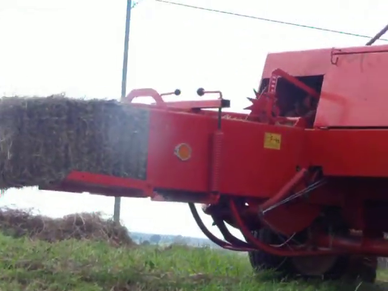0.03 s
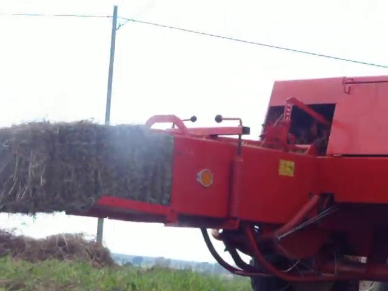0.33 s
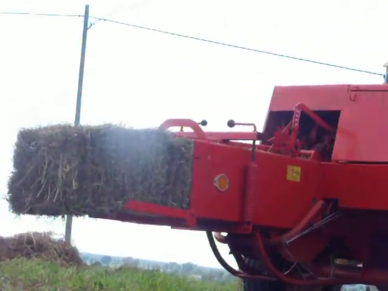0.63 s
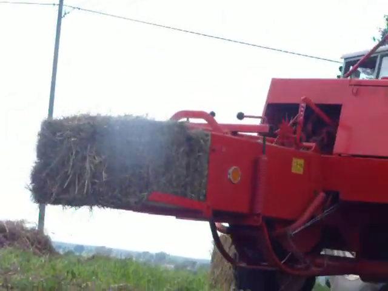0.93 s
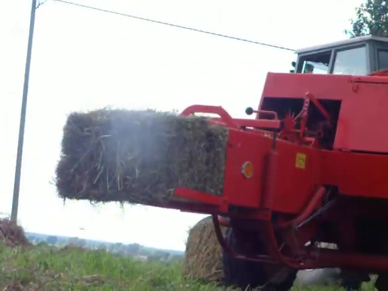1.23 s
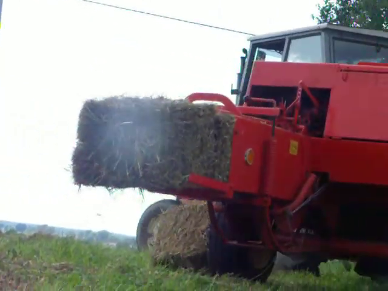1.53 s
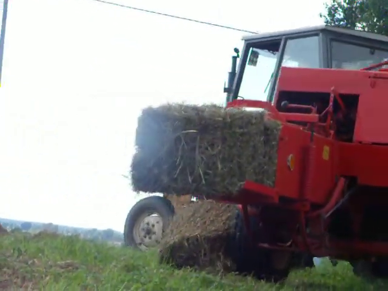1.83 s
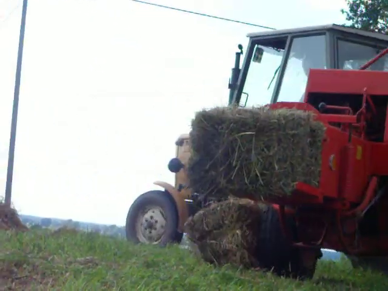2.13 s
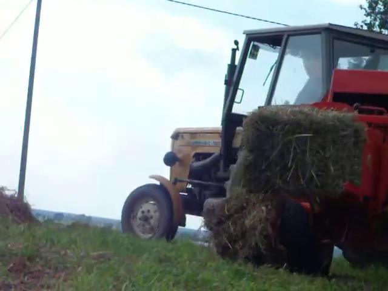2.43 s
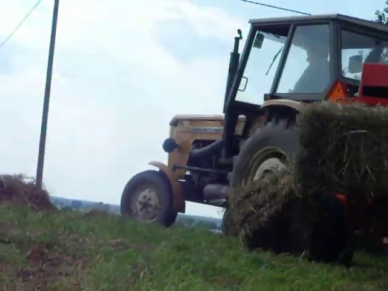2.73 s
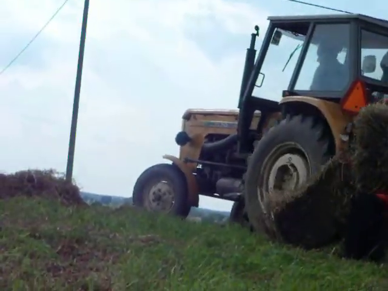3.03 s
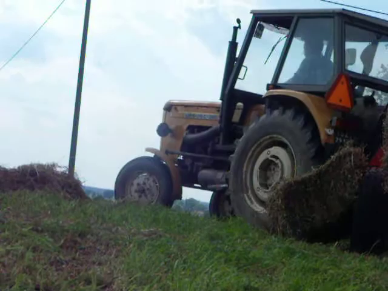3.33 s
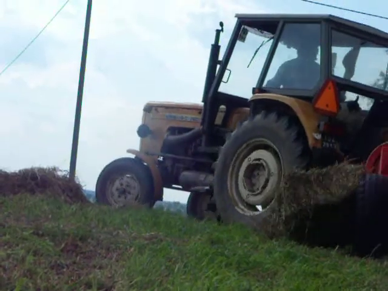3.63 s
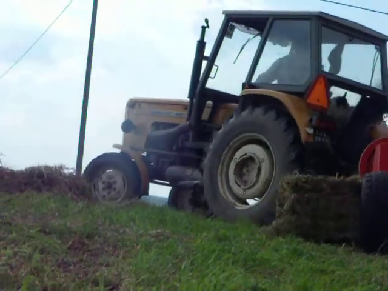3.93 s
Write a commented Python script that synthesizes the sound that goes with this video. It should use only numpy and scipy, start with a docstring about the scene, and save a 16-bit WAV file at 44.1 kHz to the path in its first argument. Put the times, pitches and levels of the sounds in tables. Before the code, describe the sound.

A hay baler works close by in an open field, its tines swishing quickly while the plunger rumbles and thuds about once a second. Metal clanks and dry stalks crunch over a steady tractor engine, with low wind later.

```python
"""Tractor and hay baler

An old diesel tractor draws a square baler past the listener and away over a field. Steel tines
(the pickup's prongs) swish through the hay three and a half times a second. The plunger that packs
it goes to and fro about once a second, shaking the sheet-metal chamber with rumble, thuds and knocks.
Stalks crunch and the feeder clanks, over the steady engine and a low wind."""
import sys
import numpy as np
from scipy import signal
from scipy.fft import rfft, irfft
from scipy.io import wavfile

SR = 44100
rng = np.random.default_rng(int(sys.argv[2]) if len(sys.argv) > 2 else 0)


def master_out(mix):
    """Clip the mix to full scale and print it as 16-bit PCM to the path in sys.argv[1]."""
    frames = np.transpose(np.atleast_2d(mix))
    ceiling = np.clip(frames, -1, 1)
    pcm = np.round(ceiling * 32767).astype(np.int16)
    wavfile.write(sys.argv[1], SR, pcm)


N = 176400
TIME = np.arange(N) / SR
FREQS = np.fft.rfftfreq(N, 1 / SR)


def amp(db):
    """Turns decibels into a gain."""
    return 10 ** (np.asarray(db) / 20)


def unit(x):
    """Scales x to a standard strength (rms 1)."""
    return x / np.sqrt(np.mean(x ** 2) + 1e-20)


def curve(points):
    """Joins (time, value) points by straight lines."""
    return np.interp(TIME, *np.transpose(points))


def colour(x, points):
    """Shapes the bass and treble of x by (f/Hz, level/dB) points, at rms 1."""
    hz, db = np.transpose(points)
    gain = amp(np.interp(np.log(FREQS + 1), np.log(hz), db))
    return unit(irfft(rfft(x) * gain, N))


def drift(rate_hz):
    """A slow random wander, at rms 1."""
    return unit(irfft(rfft(rng.standard_normal(N)) * np.exp(-(FREQS / rate_hz) ** 2), N))


def impacts(per_s, spread_db):
    """Tiny taps of uneven size at random moments."""
    size = amp(spread_db * np.minimum(rng.exponential(1, N), 4))
    return unit(size * rng.choice([-1, 1], N) * (rng.random(N) < per_s / SR))


def ring(x, modes):
    """Metal struck by x rings at its own notes; wider notes die sooner."""
    t = TIME[:SR // 4]
    body = sum(amp(db) * np.sqrt(width) * np.exp(-np.pi * width * t) * np.sin(2 * np.pi * hz * t)
               for hz, width, db in modes)
    return signal.fftconvolve(x, body / np.linalg.norm(body))[:N]


def swell(peak, rise, fall):
    """A smooth hump with its own rise and fall time."""
    return np.exp(-.5 * ((TIME - peak) / np.where(TIME < peak, rise, fall)) ** 2)


# sweeps of the tines: start t/s, scrape level/dB, rise/s, hold/s, fall/(dB per s), ring level/dB
TINE_SWEEPS = [(-.03, -13.5, 0.022, 0.012, 145, -14), (0.247, -11, .025, 0.024, 126, -13.5),
               (0.54, -11.5, 0.03, 0.0091, 128, -13.5), (.822, -17, 0.016, 0.02, 107, -16),
               (1.104, -21, 0.023, 0.017, 73, -20.5), (1.391, -14, 0.032, 0.015, 139, -13.5),
               (1.709, -11.5, 0.022, 0.0067, 125, -14), (1.968, -15.5, 0.023, 0.0089, 92, -16.5),
               (2.253, -15.5, 0.015, 0.0091, 149, -19.5), (2.519, -14, 0.037, .015, 116, -19.5),
               (2.832, -15, 0.015, 0.018, 96, -19), (3.096, -20, .035, 0.031, 88, -20),
               (3.395, -19.5, 0.018, 0.011, 92, -21.5), (3.668, -19, 0.021, 0.02, 98, -19),
               (3.955, -18.5, 0.04, 0.038, 92, -15.5)]
# tone colour of the scrape: f/Hz, level/dB
SWISH_COLOUR = [(300, -25), (1200, -23), (1900, -15), (2400, -1), (2650, 3), (3200, 3.5), (3600, 5),
                (4300, 7.5), (5200, 6), (5900, -7)]
# ringing notes of the tines and their guides: f/Hz, width/Hz, level/dB
STEEL_NOTES = [(1530, 24, -17.5), (2090, 76, -19), (2338, 91, -6.5), (2503, 68, -5.5), (2800, 170, -10.5),
               (3005, 80, 0), (3218, 120, -3), (4310, 110, -5.5), (4720, 150, -4.5), (5003, 100, -12.5),
               (5225, 110, -12.5)]

def tines(ring_lag_s=0.0075, detune=0.005):
    """Each row of tines scrapes through the hay in a burst of fine taps; then the steel rings."""
    scrape_power, ringing = np.zeros(N), np.zeros(N)
    taps = impacts(per_s=4000, spread_db=2)
    for start, scrape_db, rise, hold, fall, ring_db in TINE_SWEEPS:
        span = (TIME >= start) & (TIME < start + 0.5)
        t = TIME[span] - start
        bite = np.clip(t / rise, 0, 1) ** 1.1
        burst = bite * amp(-fall * np.maximum(t - rise - hold, 0))
        scrape_power[span] += (amp(scrape_db) * burst) ** 2
        notes = [(hz * (1 + detune * rng.standard_normal()), width, db) for hz, width, db in STEEL_NOTES]
        late_burst = np.interp(t - ring_lag_s, t, burst)
        ringing[span] += ring(amp(ring_db) * late_burst * taps[span], notes)[:len(t)]
    swish = colour(impacts(per_s=4000, spread_db=2), SWISH_COLOUR)
    return ringing + np.sqrt(scrape_power) * swish


# strokes, forward and back in turn: peak t/s, rise/s, fall/s, rumble level/dB, clatter level/dB
PLUNGER_STROKES = [(.33, 0.21, 0.13, -18.5, -19.5), (.96, 0.16, 0.18, -21, -21.5),
                   (1.37, 0.063, 0.2, -16.5, -22), (2.051, 0.19, 0.15, -18, -21.5),
                   (2.49, .11, 0.1, -18.5, -22), (3.191, 0.24, 0.096, -21.5, -22.5),
                   (3.56, 0.12, 0.22, -27, -23)]
# tone colour of the rumble: f/Hz, level/dB
RUMBLE_COLOUR = [(40, -32.5), (80, -12), (108, -3.5), (128, -3), (158, -0.5), (200, -8.5), (300, -11),
                 (500, -16.5), (1500, -55)]
# tone colour of the clatter: f/Hz, level/dB
CLATTER_COLOUR = [(100, -32), (250, -4), (380, 2.5), (550, 0.5), (800, 3.5), (1300, -6.5), (2200, -7.5),
                  (3500, -12.5), (5500, -30)]
# ringing notes of the chamber's panels: f/Hz, width/Hz, level/dB
PANEL_NOTES = [(100, 13, 0.5), (163, 18, -8), (185, 14, -4), (234, 28, -5.5), (274, 42, -3.5),
               (369, 38, -1.5), (420.3, 14, -9), (481, 18, -12.5), (632, 55, -11), (819, 30, -9)]

def plunger(ring_db=-1):
    """Each stroke makes the chamber rumble and its loose panels clatter and ring."""
    rumble_power, clatter_power = np.zeros(N), np.zeros(N)
    for peak, rise, fall, rumble_db, clatter_db in PLUNGER_STROKES:
        stroke = swell(peak, rise, fall)
        rumble_power += (amp(rumble_db) * stroke) ** 2
        clatter_power += (amp(clatter_db) * stroke) ** 2
    shake = np.sqrt(clatter_power)
    rattle = impacts(per_s=900, spread_db=3)
    rumble = np.sqrt(rumble_power) * colour(rng.standard_normal(N), RUMBLE_COLOUR)
    clatter = shake * colour(rattle, CLATTER_COLOUR)
    return rumble + clatter + amp(ring_db) * ring(shake * rattle, PANEL_NOTES)


# blows on the wad of hay: t/s, peak level/dB, starting f/Hz
WAD_THUDS = [(.055, -16, 150.7), (0.171, -9.5, 136), (0.212, -8.5, 150), (0.272, -8, 124), (.452, -11, 128),
             (.80, -16, 112), (0.977, -13, 150), (1.015, -11.5, 106), (1.078, -10, 99), (1.284, -8, 157),
             (1.382, -10.5, 150), (1.92, -14, 130), (2.112, -11, 104), (2.305, -10, 173), (2.4, -10, 109),
             (2.461, -7.5, 119.4), (3.06, -14, 110), (3.165, -6.5, 160), (3.213, -7.5, 160),
             (3.487, -11, 132), (3.558, -10.5, 113), (3.672, -14.5, 153)]

def thuds(rise_s=0.0086, sag_per_s=1.6):
    """Ramming the soft wad gives a short, low boom that sags in pitch."""
    out = np.zeros(N)
    for start, db, hz in WAD_THUDS:
        t = np.clip(TIME - start, 0, 0.2)
        age = t / rise_s
        blow = (age * np.exp(1 - age)) ** 2
        out += amp(db) * blow * np.sin(2 * np.pi * hz * t * (1 - sag_per_s * t / 2))
    return out


# bumps of the frame: t/s, peak level/dB
FRAME_KNOCKS = [(1.663, -4), (2.055, -17), (2.471, -15), (3.778, -7.5)]

def knocks():
    """Each bump is a dull push, followed by a short ring of the panels."""
    pushes = np.zeros(N)
    for start, db in FRAME_KNOCKS:
        push_s = rng.uniform(0.0012, 0.00135)
        age = np.maximum(TIME - start, 0) / push_s
        push = age * (2 - age) * np.exp(-age)
        pushes -= amp(db) * push / push.max()
    return pushes + 0.0181 * ring(pushes, PANEL_NOTES)


# clanks of the rods that work the feeder: t/s, level/dB, fall/(dB per s)
FEEDER_CLANKS = [(.01, -18.5, 137), (.222, -21.5, 290), (.285, -17.5, 89), (.865, -16.5, 180),
                 (0.973, -17, 160), (1.371, -16, 134), (1.44, -26.5, 110), (1.868, -23.5, 244),
                 (1.995, -21.5, 204), (2.085, -23, 197), (2.59, -21.5, 147), (3.168, -21, 130)]
# tone colour of a clank: f/Hz, level/dB
CLANK_COLOUR = [(150, -16), (380, 4), (600, 2.5), (830, -3), (1100, 1), (1300, -15.5), (1520, 0.5),
                (2200, -3.5), (3000, -6), (3700, -10.5), (5500, -22)]

def clanks(rise_s=0.013):
    """Loose joints pull tight with a short, dry rattle."""
    force = np.zeros(N)
    for start, db, fall in FEEDER_CLANKS:
        t = TIME - start
        force += np.clip(t / rise_s, 0, 1) * amp(db - fall * np.maximum(t - rise_s, 0))
    return force * colour(impacts(per_s=2500, spread_db=1.5), CLANK_COLOUR)


# crunches in the feeder: peak t/s, rise/s, fall/s, level/dB
HAY_CRUNCHES = [(.16, 0.04, 0.1, -23.5), (.46, 0.056, 0.094, -22), (.715, .015, 0.027, -19.5),
                (.99, .03, .08, -23.5), (1.32, 0.046, 0.13, -20), (1.875, 0.011, 0.016, -22),
                (1.946, 0.0088, 0.013, -16.5), (2.095, .02, .015, -19), (2.19, .04, 0.023, -33),
                (2.43, 0.035, .06, -22), (3.02, .04, .05, -22.5), (3.24, .02, .02, -25),
                (3.5, 0.018, .02, -34), (3.565, 0.032, 0.051, -25)]
# tone colour of dry hay: f/Hz, level/dB
HAY_COLOUR = [(300, -18.5), (900, -10.5), (1500, -6), (2300, -6), (3000, -0.5), (3600, -5.5), (4600, -0.5),
              (5500, -11.5)]

def hay():
    """Dry stalks crackle as they are packed in."""
    power = sum((amp(db) * swell(peak, rise, fall)) ** 2 for peak, rise, fall, db in HAY_CRUNCHES)
    return np.sqrt(power) * colour(impacts(per_s=2700, spread_db=2.5), HAY_COLOUR)


# slight, uneven fade of feed and engine as the tractor draws away: t/s, level/dB
DRAWING_AWAY = [(0, 0), (1, -1.5), (2, -0.6), (3, -2.5), (4, -1.5)]

def feed(turn_s=1.12, quiet_at_s=1.66, swing_db=1.5):
    """Chains and stalks jingle and hiss, swelling and easing with each turn of the flywheel."""
    swing = np.cos(2 * np.pi * (TIME - quiet_at_s) / turn_s)
    level = amp(curve(DRAWING_AWAY) - swing_db * swing)
    jingle = amp(-29.5) * ring(level * impacts(per_s=1500, spread_db=3), STEEL_NOTES)
    hiss = amp(-32) * level * colour(rng.standard_normal(N), HAY_COLOUR)
    return jingle + hiss


# how often the engine fires: t/s, f/Hz
FIRING_RATE = [(0, 82.3), (.6, 82), (1.1, 79), (1.4, 81.2), (1.9, 81.8), (2.3, 81.4), (3.1, 82), (4, 85)]
# loudness of the hum at that rate: t/s, level/dB
HUM_LEVEL = [(0, -32), (.6, -31), (1.3, -27), (2.1, -27.5), (2.7, -37), (4, -32.5)]
# weaker engine tones: multiple of the firing rate, level/dB
ENGINE_TONES = [(1 / 2, -43), (5 / 4, -35.5), (2.5, -36.5), (9 / 4, -36), (5 / 2, -39.5)]
# tone colour of the engine's roar and moving parts: f/Hz, level/dB
ROAR_COLOUR = [(30, -21.5), (70, -11.5), (110, 1.5), (170, -2.5), (260, -2), (450, -5.5), (800, -8.5),
               (1300, -14), (2300, -17.5), (3100, -26.5), (3800, -18.5), (5200, -23.5)]

def engine(waver_db=2, throb_depth=0.13, roar_db=-20):
    """The diesel's firings blend into low tones, and its roar throbs with each one."""
    firings = np.cumsum(curve(FIRING_RATE)) / SR
    phase = 2 * np.pi * firings
    hum = amp(curve(HUM_LEVEL)) * np.sqrt(2) * np.sin(phase)
    tones = np.zeros(N)
    for multiple, db in ENGINE_TONES:
        level = amp(db + waver_db * drift(rate_hz=2.1))
        tones += level * np.sqrt(2) * np.sin(multiple * phase + 2 * np.pi * rng.random())
    throb = 1 + throb_depth * (np.cos(phase) + 0.48 * np.cos(phase / 2))
    roar = amp(roar_db) * colour(throb * rng.standard_normal(N), ROAR_COLOUR)
    return hum + (tones + roar) * amp(curve(DRAWING_AWAY))


# strength of the wind: t/s, level/dB
WIND_STRENGTH = [(0, -39), (1.3, -39.5), (1.8, -28.5), (2.45, -25.5), (3.2, -28), (4, -31.5)]
# tone colour of the wind: f/Hz, level/dB
WIND_COLOUR = [(10, -21), (25, -11), (40, 0), (52, -4.5), (66, 1.5), (90, -5.5), (200, -19), (600, -51)]

def wind(flutter_db=2.2):
    """Wind on the microphone makes a low, lumpy rumble."""
    level = amp(curve(WIND_STRENGTH) + flutter_db * drift(rate_hz=13))
    return level * colour(rng.standard_normal(N), WIND_COLOUR)


def scene():
    """Tractor and baler in the open field, heard in mono."""
    return (engine() + tines() + plunger() + thuds() + knocks() + clanks() + hay() + feed() + wind())[None]


def record(dry):
    """Cuts the high treble and flattens the loudest peaks, a slight overload."""
    ceiling = amp(-3)
    treble_cut = signal.firwin(141, 5750, window=("kaiser", 7), fs=SR)[None]
    edge_cut = signal.firwin(511, 15900, window=("kaiser", 9), fs=SR)[None]
    dulled = signal.oaconvolve(np.clip(dry, -ceiling, ceiling), treble_cut, "same")
    return signal.oaconvolve(np.clip(dulled, -ceiling, ceiling), edge_cut, "same")


dry = scene()
out = record(dry)
master_out(out)
```